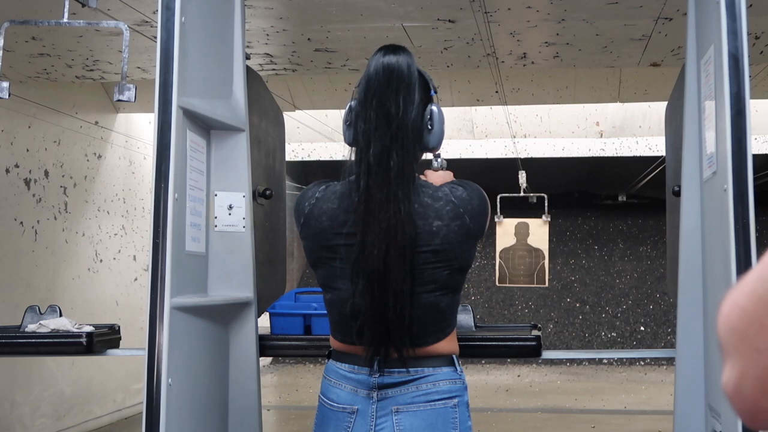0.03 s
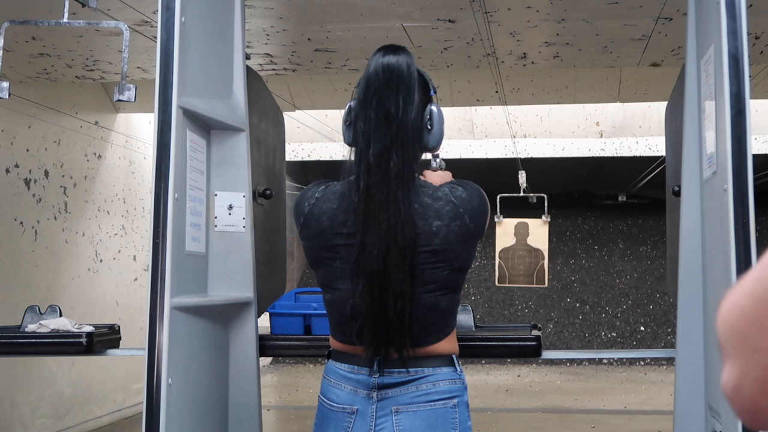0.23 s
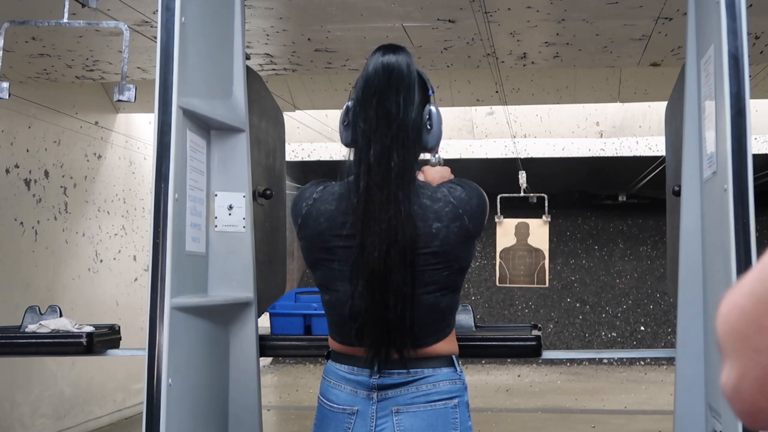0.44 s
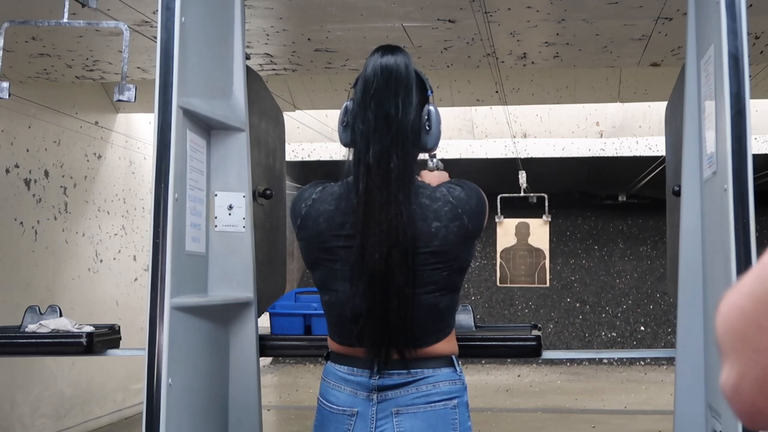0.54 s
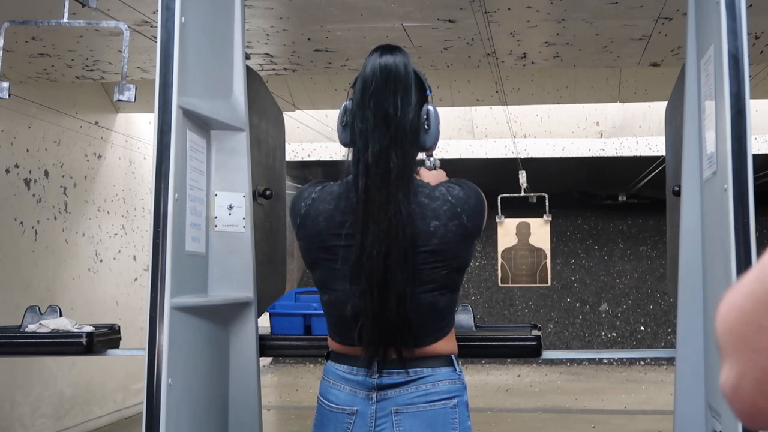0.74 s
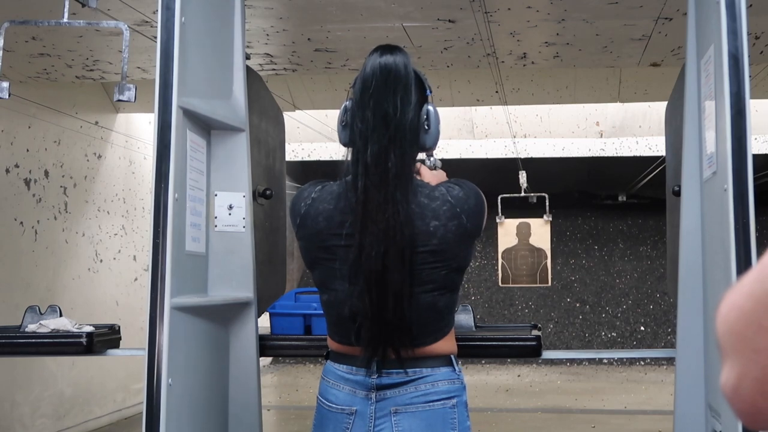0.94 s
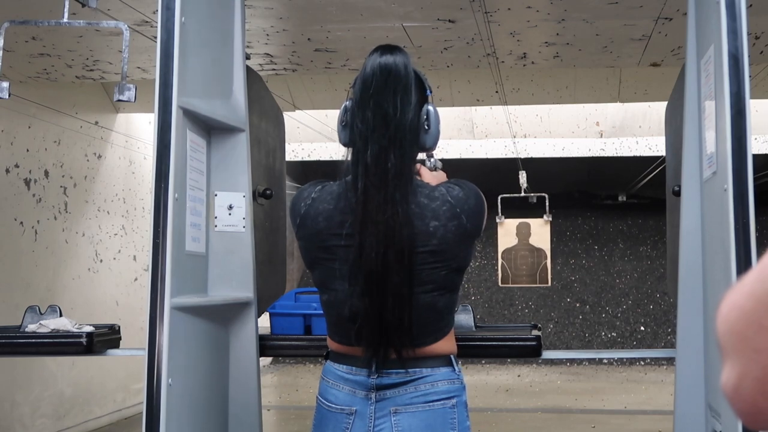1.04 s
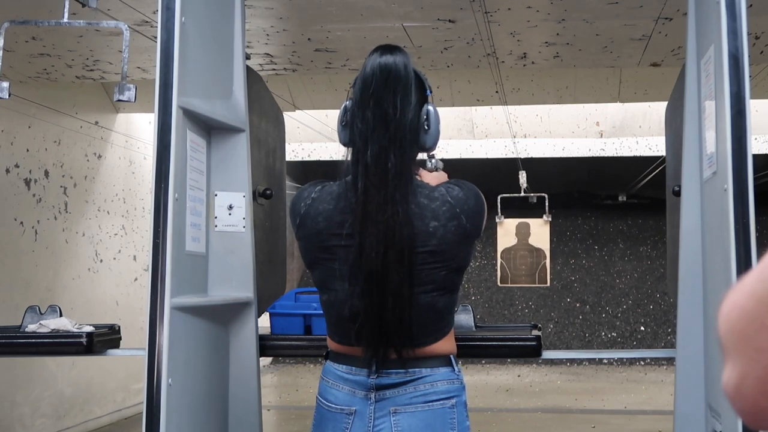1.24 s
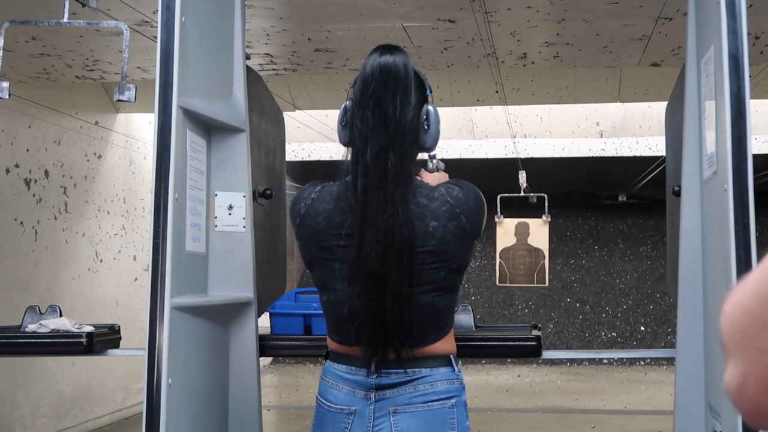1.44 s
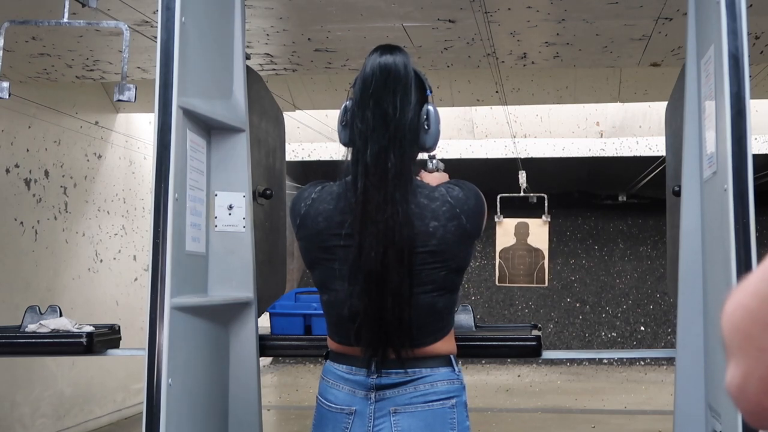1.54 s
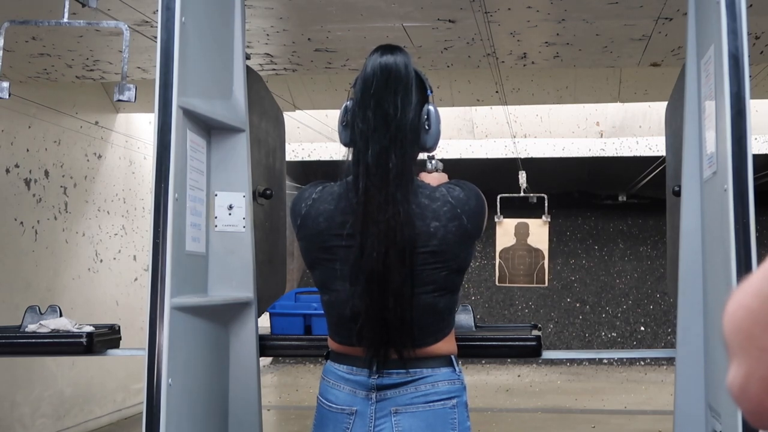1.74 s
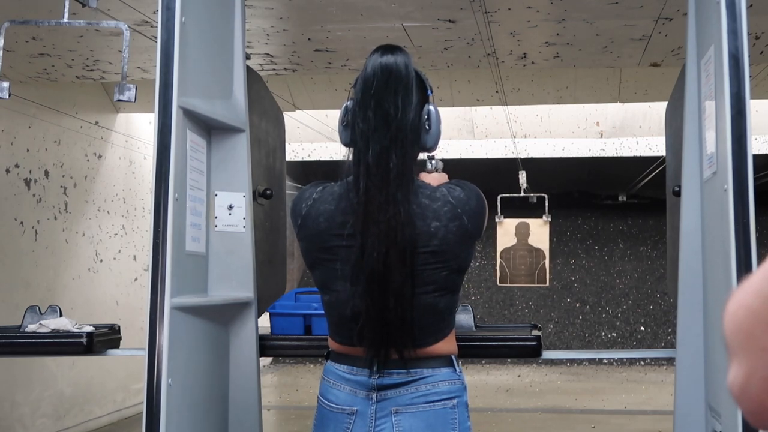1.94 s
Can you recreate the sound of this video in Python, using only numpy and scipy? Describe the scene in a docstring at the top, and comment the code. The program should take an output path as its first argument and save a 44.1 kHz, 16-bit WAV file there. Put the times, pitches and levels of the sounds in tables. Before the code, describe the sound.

One handgun shot overloads the microphone indoors, leaving a brief dropout and a muffled, fading echo

```python
"""Concrete indoor range: one handgun shot over steady ventilation, heard by a phone behind the shooter.
Air and hall are banded noise, the duct drone and muzzle crack resonated noise, the blast a pressure wave.
Booth boom, spent case, bench knock, light taps and a muffled far bang are decaying sine modes.
The blast overloads the phone, which goes nearly deaf, comes back bass first and stays much less sensitive."""
import sys
import numpy as np
from scipy import signal
from scipy.io import wavfile

SR = 44100
rng = np.random.default_rng(int(sys.argv[2]) if len(sys.argv) > 2 else 0)


def gain_from_decibels(decibels):
    """Convert decibel values to linear amplitude factors."""
    exponent = np.asarray(decibels, float) / 20
    return 10 ** exponent


def pcm_store(signal):
    """Save signal as 16-bit PCM."""
    levels = np.round(np.clip(np.atleast_2d(signal), -1, 1) * 32767)
    wavfile.write(sys.argv[1], SR, levels.astype(np.int16).T)


N = 88200
T = np.arange(N) / SR
SHOT_S, PUSH_DELAY_S, SUCTION_S = 0.3822, 0.0092, 0.0026  # pressure wave lags the crack, suction first


def rms_one(x):
    """Scale to unit rms."""
    return x / np.sqrt(np.mean(x ** 2) + 1e-20)


def at_hz(points, hz):
    """Read a table on a log-frequency axis."""
    table_hz, values = np.array(points)[:, :2].T
    return np.interp(np.log(hz), np.log(table_hz), values)


def in_time(rows, t):
    """Join curve points by straight lines, one result per column."""
    s, *columns = np.transpose(rows)
    return np.array([np.interp(t, s, c) for c in columns])


def drift(rate_hz):
    """Slow random wander of spread 1: twice-smoothed noise at SR / 40, interpolated."""
    hop, settle = 40, 2000
    r = np.exp(-2 * np.pi * rate_hz * hop / SR)
    noise = rng.standard_normal(N // hop + 2 + settle)
    slow = rms_one(signal.lfilter([1], [1, -2 * r, r * r], noise)[settle:])
    return np.interp(np.arange(N) / hop, np.arange(len(slow)), slow)


def resonance(x, hz, width_hz):
    """Two-pole peak of gain 1."""
    r = np.exp(-np.pi * width_hz / SR)
    b = (1 - r * r) / 2
    return signal.lfilter([b, 0, -b], [1, -2 * r * np.cos(2 * np.pi * hz / SR), r * r], x)


def struck(hits, modes):
    """Every hit sets all modes ringing as decaying sines, each with a strength of its own."""
    out = np.zeros(N)
    spread_db = rng.normal(0, 1.3, (len(hits), len(modes)))
    for (start_s, hit_db), row in zip(hits, spread_db):
        t = np.maximum(T - start_s, 0)
        attack = np.minimum(t / 0.0017, 1)
        for (hz, mode_db, t60_s), extra_db in zip(modes, row):
            decay = gain_from_decibels(hit_db + mode_db + extra_db - 60 * t / t60_s)
            out += decay * np.sin(2 * np.pi * hz * t) * attack
    return out


def banded_noise(spectrum, likeness, envelope):
    """Third-octave stereo noise; unit rms before each band takes envelope(hz)."""
    settle = 4000
    edges_hz = 30 * 2 ** np.arange(0, 9.3, 1 / 3)
    white = rng.standard_normal((2, 2, N + settle))  # neighbouring bands take different noise
    out, power = 0, 0
    for k, (low, high) in enumerate(zip(edges_hz, edges_hz[1:])):
        band = signal.butter(2, [low, high], "band", fs=SR, output="sos")
        mid, side = signal.sosfilt(band, white[k % 2])[:, settle:]
        hz = np.sqrt(low * high)
        alike = np.clip(at_hz(likeness, hz), -1, 1)
        gain = gain_from_decibels(at_hz(spectrum, hz))
        power += gain ** 2 * (high - low) * 4.4 / SR
        stereo = np.sqrt(1 + alike) * mid + np.sqrt(1 - alike) * side * [[1], [-1]]
        out = out + gain * envelope(hz) * stereo
    return out / np.sqrt(power)


def ventilation():
    """Broad air noise, fluttering band by band, with a wavering duct drone of resonated noise."""
    # pitch_hz, level_db_per_hz
    air_spectrum = [(18, -48), (30, -15.5), (146, -3), (207, -14), (301, -10), (333, -14), (655, -19),
                    (761, -15.5), (1170, -29), (1620, -25), (12000, -45), (15600, -75), (22000, -120)]
    # pitch_hz, left_right_likeness
    air_likeness = [(60, 1.0), (150, 1.0), (380, 1.0), (950, 0.97), (2380, 0.84), (5980, -0.62),
                    (15000, -0.74)]
    # time_s, level_db
    air_swell = [(0, 0.5), (.17, 1.5), (.215, 2.5), (.27, 2.5), (.38, 5), (1.3, 0.6), (1.6, 3.5), (2, 6)]
    duct_swell = [(0, -6.5), (.18, 6.5), (.21, 15), (.25, 10), (.275, 0), (.33, 1.5), (.38, -5.5), (2, 1.6)]
    air_db, duct_db, duct_hz, duct_width_hz = -28.5, -34.5, 135.8, 28
    air = banded_noise(air_spectrum, air_likeness, lambda hz: gain_from_decibels(1.8 * drift(4)))
    drone = resonance(rng.standard_normal(N), duct_hz, duct_width_hz)
    drone = rms_one(resonance(drone, duct_hz, duct_width_hz))
    return gain_from_decibels(air_db + in_time(air_swell, T)) * air + gain_from_decibels(duct_db + in_time(duct_swell, T)) * drone


def far_bang():
    """Muffled bang far off: two low wall modes."""
    # start_s, level_db
    thump = [(1.84, -15)]
    # pitch_hz, level_db, t60_s
    wall_modes = [(78.4, 0.73, 0.55), (144, -1.5, 0.31)]
    return struck(thump, wall_modes)


def light_taps():
    """Two light taps just before the shot: short damped modes."""
    # start_s, level_db
    tap_hits = [(.289, -21), (.299, -25)]
    # pitch_hz, level_db, t60_s
    tap_modes = [(900, 3.5, 0.034), (1750, -5, 0.059), (270, -2.5, 0.2)]
    return struck(tap_hits, tap_modes)


def bench_knock():
    """Knock on the bench: damped low modes, stronger on the left."""
    # start_s, level_db
    knock_hits = [(1.2245, -5.5)]
    # pitch_hz, level_db, t60_s
    bench_modes = [(229, 4, 0.19), (140, -1, 0.46), (427, -14, 0.15), (615, -31, 0.045), (780, -10, .08)]
    return struck(knock_hits, bench_modes) * gain_from_decibels([[1.5], [-1.5]])


def spent_case():
    """Bouncing case: high metal modes, stronger on the left; the ring wavers as the case rolls."""
    # start_s, level_db
    bounces = [(1.131, -42), (1.49, -24), (1.55, -38), (1.69, -37.5), (1.805, -46), (1.843, -41.5)]
    # pitch_hz, level_db, t60_s
    case_modes = [(11430, 6.5, 0.42), (11450, -1.5, 0.51), (5140, -8, 0.051), (5500, -9, 0.057),
                  (6800, -6, .03), (12300, -8, .04)]
    roll_db, roll_hz = 3, 25
    return struck(bounces, case_modes) * gain_from_decibels(roll_db * drift(roll_hz) + [[1.2], [-1.2]])


def hall_envelope(hz):
    """The shot and lesser sounds fill each band, then die at the hall's rate."""
    # pitch_hz, t60_s
    hall_t60 = [(50, .5), (120, 0.8), (250, 0.87), (500, 1.34), (1500, 1.165), (3300, 0.87), (4300, 0.56),
                (6500, .5), (9000, .3), (12000, 0.15)]
    # lesser sounds: start_s, level_db at 1 kHz, tilt_db_per_octave, share of the hall's t60
    stirs = [(.188, -29.5, -2.5, 0.42), (0.291, -18, -4.5, 0.028), (1.129, -14, 2, 0.082),
             (1.224, -2.5, -0.9, 0.11), (1.248, -18.5, -2, 1.4), (1.488, -44, 3, .12),
             (1.632, -19, 1, 0.12), (1.689, -48, 10.5, .12), (1.8417, -21.5, 6, .06),
             (1.847, -15.5, 0, 1.2), (1.861, -30, 7, 0.16), (1.974, -23, -2, 0.28)]
    shot_db, build_s, build_cycles = 20.5, 0.016, 9.0
    stir_t60_floor_s = 0.8  # near sounds keep their treble
    t60_s, t = at_hz(hall_t60, hz), np.maximum(T - SHOT_S, 0)
    build = 1 - np.exp(-(t / (build_s + build_cycles / hz)) ** 2)  # bass fills later
    power = (gain_from_decibels(shot_db - 60 * t / t60_s) * build) ** 2
    for start_s, level_db, tilt_db, share in stirs:
        t = np.maximum(T - start_s, 0)
        stir_t60_s = share * max(t60_s, stir_t60_floor_s)
        decay = gain_from_decibels(level_db + tilt_db * np.log2(hz / 1000) - 60 * t / stir_t60_s)
        power += (decay * np.minimum(t * hz, 1)) ** 2
    return np.sqrt(power) * gain_from_decibels(0.4 * drift(36))


def hall():
    """Diffuse reverberation: stereo noise whose bands decay separately."""
    # pitch_hz, level_db_per_hz
    hall_spectrum = [(40, -19.5), (100, -13), (340, -3), (830, -4.5), (1210, -12), (1870, -11.5),
                     (3200, -8.5), (4000, -20), (5300, -22), (7000, -27.5), (9000, -32), (12000, -40),
                     (14000, -55)]
    # pitch_hz, left_right_likeness
    hall_likeness = [(60, 1), (700, 1), (1300, .91), (2400, 0.72), (4400, -0.48), (6000, .1), (8100, -.35),
                     (15000, -0.53)]
    return banded_noise(hall_spectrum, hall_likeness, hall_envelope)


def booth_boom():
    """Booth partitions boom as the push begins, the right channel 0.7 ms later."""
    # pitch_hz, level_db, t60_s
    booth_modes = [(379.4, 2, .3), (302, -2.5, .25), (95, -7, 0.15)]
    boom_db, start_s = 8.5, SHOT_S + PUSH_DELAY_S + SUCTION_S
    return np.array([struck([(start_s + lag_s, boom_db)], booth_modes) for lag_s in (0, 0.0007)])


def muzzle_crack():
    """Crack ringing in the booth: resonated noise, each ring with its own rise, under one decay."""
    # pitch_hz, width_hz, level_db, rise_s
    crack_rings = [(3000, 1500, -1, .0015), (1601, 1300, 7, .008), (8600, 2500, -10, 0.00027),
                   (11260, 2000, -13.5, 0.00022), (14300, 4000, -17.5, .006), (6140, 2800, -11, 0.011)]
    crack_db, t60_s = -5.5, 0.032
    t, noise = np.maximum(T - SHOT_S, 0), rng.standard_normal((2, N))
    ring = 0
    for hz, width_hz, level_db, rise_s in crack_rings:
        tone = rms_one(resonance(resonance(noise, hz, width_hz), hz, width_hz))
        ring = ring + gain_from_decibels(level_db) * tone * np.minimum(t / rise_s, 1) ** 2
    return gain_from_decibels(crack_db - 60 * t / t60_s) * ring


def pressure_wave():
    """Suction, then a push, then a slow rebound of pressure, alike in both channels."""
    push_s, push_db, rebound_s, rebound_db = 0.003, 11, 0.006, 19
    t = np.maximum(T - SHOT_S, 0) - PUSH_DELAY_S
    suction = np.sin(np.pi * np.clip(t / SUCTION_S, 0, 1))
    push = np.abs(np.sin(np.pi * np.clip((t - SUCTION_S) / push_s, 0, 1))) ** 1.2
    late = np.maximum(t - SUCTION_S - push_s, 0) / rebound_s
    return gain_from_decibels(push_db) * (push - suction) - gain_from_decibels(rebound_db) * late * np.exp(-late)


def scene():
    """All sources at the microphones."""
    noise_cut = signal.butter(10, 12600, fs=SR, output="sos")
    noise = signal.sosfilt(noise_cut, ventilation() + hall())
    small = far_bang() + light_taps() + bench_knock() + spent_case()
    return noise + small + booth_boom() + muzzle_crack() + pressure_wave()


def low_pass(x):
    """Removes everything above the highest recorded frequency."""
    return signal.sosfilt(signal.butter(12, 20000, fs=SR, output="sos"), x)


def record(dry):
    """The first steep overload trips a gain cut in four bands; the sum is then limited to full scale."""
    # sensitivity: time since overload_s, left_db, right_db
    deep_gain = [(0, -1.5, -1.5), (0.0163, 4.5, 1.5), (0.0142, -30.5, -27.5), (.034, -62, -63.5),
                 (0.0435, -70.5, -70.5), (0.0428, -43.5, -40.5), (0.049, -43.5, -51.5), (.053, -11.5, -9.5),
                 (0.065, -25, -21.5), (.2, -24, -24.5), (.215, -31.5, -32), (.45, -34, -36),
                 (.8, -38.5, -35.5), (1.6, -30, -30.5)]
    low_gain = [(0, -3.5, 0.5), (.0145, -6.5, -10), (.0155, -31.5, -27), (.034, -63.5, -62),
                (.0425, -72, -73), (.0432, -41, -40), (.051, -42.5, -42), (.053, -12, -22),
                (.064, -19, -38), (.079, -26, -36.5), (.082, -27, -27.5), (.3, -27.5, -27),
                (1.6, -28, -26.5)]
    mid_gain = [(0, -1.5, -0.5), (.0145, 2, -3.5), (.0155, -29, -26), (.034, -62, -57.5),
                (.045, -64.5, -69), (.062, -55, -54.5), (.072, -30, -66), (.079, -33.5, -14.5),
                (0.083, -25, -24.5), (0.298, -31, -30.5), (1.6, -34, -33.5)]
    top_gain = [(0, 4, 3), (.0145, 0.5, 0), (.0155, -28, -26.5), (.034, -67.5, -66.5), (.06, -73.5, -69),
                (.066, -34.5, -41.5), (.078, -12, -13.5), (.082, -13, -14), (.13, -29, -27),
                (.3, -54, -61.5), (.7, -50.5, -46), (1.6, -38, -42)]
    overload_step, splits_hz = 0.1, (190, 520, 7800)
    rumble_cut_hz, treble_cut_hz = 22, 17000
    steep = np.abs(np.diff(dry)).max(axis=0) > overload_step
    since_s = T - np.argmax(steep) / SR
    # zero-phase lowpasses; their differences are the bands
    deep, low, mid = [signal.sosfiltfilt(signal.butter(4, hz, fs=SR, output="sos"), dry) for hz in splits_hz]
    bands = [(deep, deep_gain), (low - deep, low_gain), (mid - low, mid_gain), (dry - mid, top_gain)]
    x = sum(band * gain_from_decibels(in_time(gain, since_s)) for band, gain in bands)
    x = signal.sosfilt(signal.butter(1, rumble_cut_hz, "high", fs=SR, output="sos"), x)
    x = np.sqrt(np.tanh(x ** 2)) * np.sign(x)  # soft limit at 1
    x = signal.sosfilt(signal.butter(3, treble_cut_hz, fs=SR, output="sos"), x)
    return low_pass(np.clip(x, -1, 1))


dry = scene()
out = record(dry)
pcm_store(out)
```